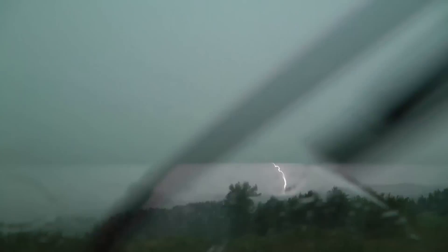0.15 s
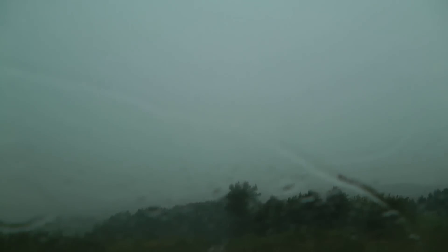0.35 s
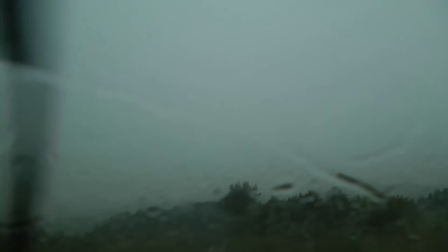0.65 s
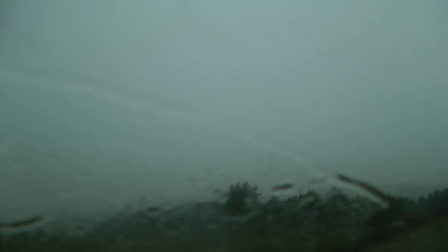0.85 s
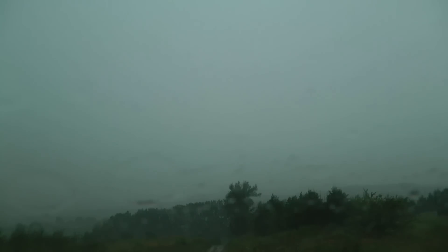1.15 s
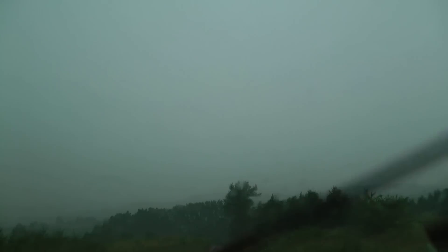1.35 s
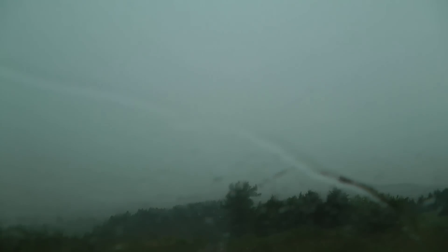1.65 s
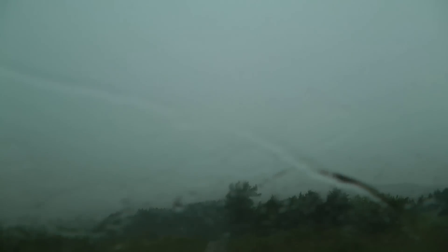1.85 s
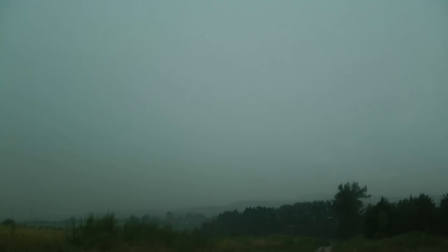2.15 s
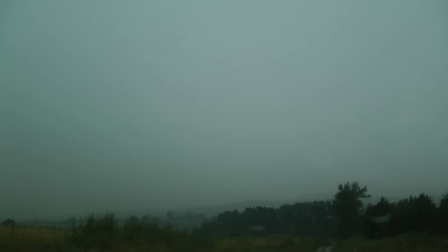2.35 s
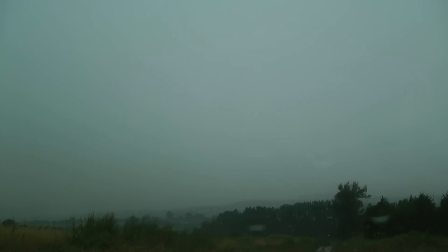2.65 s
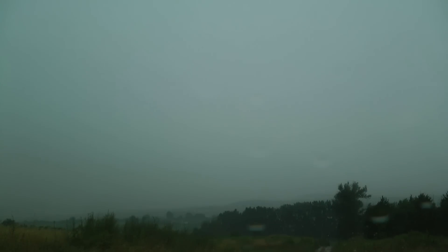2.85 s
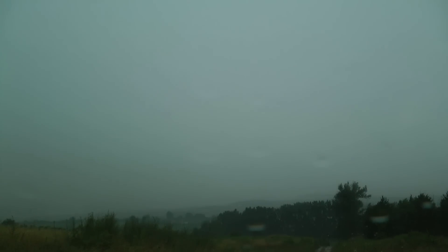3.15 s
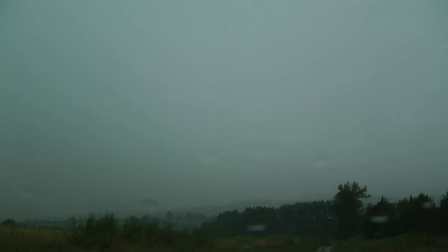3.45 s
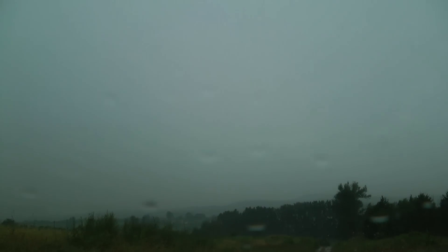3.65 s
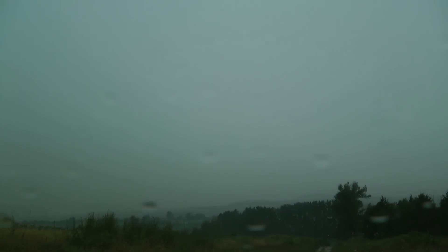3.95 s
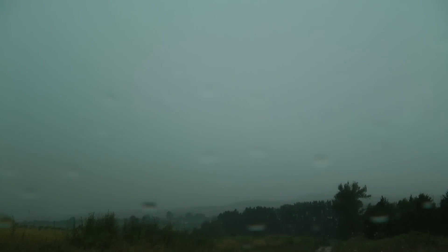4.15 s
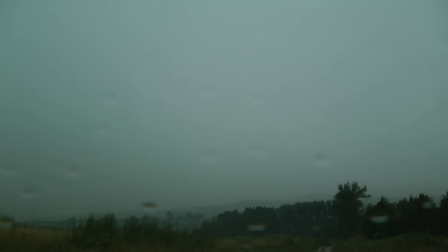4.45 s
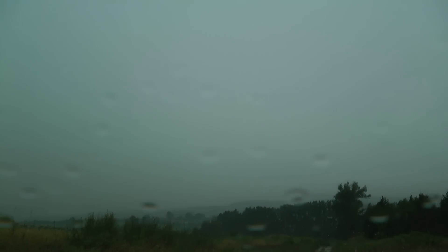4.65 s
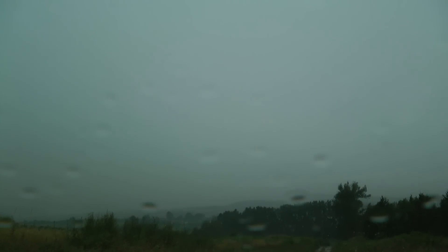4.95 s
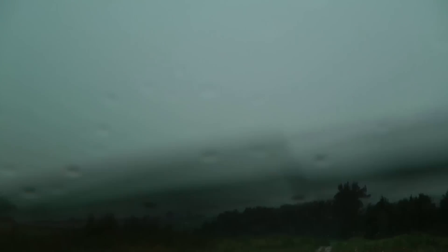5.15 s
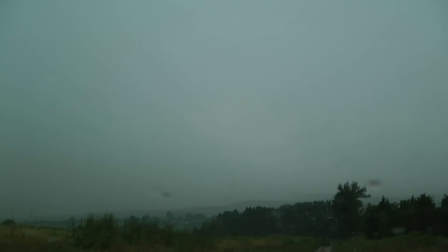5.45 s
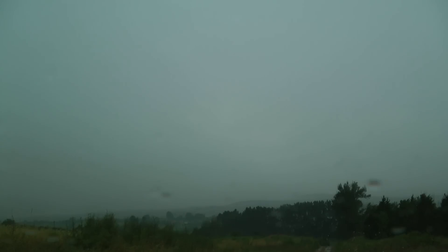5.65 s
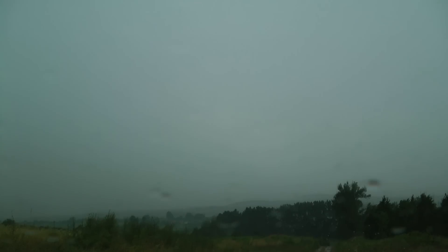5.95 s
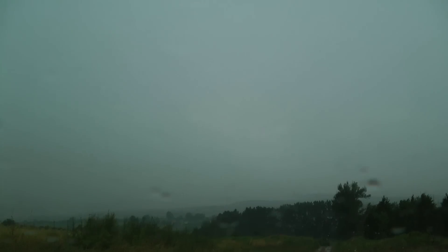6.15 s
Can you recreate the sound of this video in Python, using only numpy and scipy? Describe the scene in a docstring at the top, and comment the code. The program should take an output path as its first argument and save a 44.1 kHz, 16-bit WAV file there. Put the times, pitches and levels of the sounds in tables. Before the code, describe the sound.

A loud downpour crackles on car glass for three seconds, suddenly eases to soft drizzle over engine and fan hum, ending in clustered cabin thumps.

```python
"""Rain on a parked car

Inside a parked car, engine idling and fan on. A downpour drums on the roof (filtered noise) and cracks on the
windshield (dispersed clicks) while wipers knock; after three seconds the scene changes to light rain. Engine
and fan hum as sums of sines, 8.5 dB lower during the downpour. Dull thumps (noise knocks with decaying sine
booms) sound throughout and crowd together near the end, with a tiny squeak."""
import sys
import numpy as np
from scipy import signal
from scipy.fft import irfft
from scipy.io import wavfile

SR = 44100
rng = np.random.default_rng(int(sys.argv[2]) if len(sys.argv) > 2 else 0)


def unload_audio(sound):
    """Save the sound as a 16-bit wav file, at the path given as the first command line argument."""
    columns = np.transpose(np.atleast_2d(sound))
    # keep every value between -1 and 1, then stretch to whole-number steps
    steps = np.round(np.clip(columns, -1, 1) * 32767)
    wavfile.write(sys.argv[1], SR, steps.astype(np.int16))


N = 277830
TIME = np.arange(N) / SR
HZ = np.fft.rfftfreq(8192, 1 / SR) + 1  # offset avoids log(0)
CHANGE_S = 3.031  # the scene changes from downpour to light rain
FAN_HZ = 62.45

# dull thumps in the cabin: start_s, boom_peak_db, pitch_hz, knock_edge_hz, knock_peak_db
THUMPS = [(.066, -23, 223, 1400, -20), (0.287, -16.5, 180, 400, -31), (0.513, -17, 201, 400, -27),
          (0.863, -28, 246, 1490, -15), (.945, -26, 200, 400, -33), (1.066, -24, 205, 400, -33),
          (1.295, -20, 205, 1500, -20), (1.448, -31, 287, 1000, -10), (1.96, -26, 203, 500, -23),
          (2.163, -21, 207, 500, -29), (2.256, -14.5, 208, 500, -22), (2.392, -24, 220, 910, -12),
          (2.48, -26, 231, 597, -26), (2.62, -20, 185, 900, -15), (2.89, -18, 192, 400, -32),
          (3.0, -21, 200, 400, -33), (3.296, -21.5, 202, 497, -24), (3.321, -19, 134, 400, -28),
          (3.351, -24.5, 280, 900, -17), (3.455, -18.5, 198, 400, -31), (4.38, -22, 204, 400, -36),
          (4.934, -24, 124, 400, -27), (4.955, -31, 209, 400, -30), (5.335, -32, 189, 400, -28),
          (5.701, -28, 200, 398, -31), (5.920, -16.5, 205, 400, -28), (5.944, -31, 232, 890, -23.5),
          (5.987, -20.5, 218, 400, -33), (6.054, -23, 224, 900, -31), (6.104, -18, 231, 910, -15.5),
          (6.14, -14.5, 216, 600, -30), (6.161, -15.5, 142, 800, -16), (6.174, -22, 260, 1000, -21),
          (6.181, -17.5, 326, 1550, -9), (6.19, -22, 280, 1400, -22), (6.196, -26, 262, 1600, -22),
          (6.204, -13, 194, 700, -27), (6.219, -18, 130, 400, -29), (6.268, -23, 232, 400, -33)]


def amp(db):
    """Decibels to gain."""
    return 10 ** (np.asarray(db) / 20)


def evened(x):
    """Scales to rms 1."""
    return x / np.sqrt(np.mean(x ** 2) + 1e-20)


def read(points):
    """Spectrum table interpolated over log frequency onto the grid."""
    f, value = np.transpose(points)
    return np.interp(np.log(HZ), np.log(f), value)


def add(mix, s, sound):
    """Mixes a sound in at time s."""
    part = mix[..., max(round(s * SR), 0):][..., :sound.shape[-1]]
    part += sound[..., :part.shape[-1]]


def colour(x, gain):
    """Causal minimum-phase filter with the given gain on the frequency grid."""
    log_gain = np.log(np.maximum(gain / gain.max(), 1e-5))
    circle = np.concatenate([log_gain, log_gain[-2:0:-1]])
    spectrum = np.exp(np.conj(signal.hilbert(circle)))
    taps = np.fft.ifft(spectrum).real[:len(HZ)]
    return gain.max() * signal.oaconvolve(x, taps)[:len(x)]


def below(edge_hz, order):
    """Gain of a low-pass."""
    return 1 / np.sqrt(1 + (HZ / edge_hz) ** (2 * order))


def above(edge_hz, order):
    """Gain of a high-pass."""
    return 1 / np.sqrt(1 + (edge_hz / HZ) ** (2 * order))


def drift(per_s):
    """Random wander: unit-variance knots joined by straight lines."""
    knots = rng.standard_normal(N // 64)
    return np.interp(TIME * per_s, np.arange(len(knots)), knots)


def lifts(resonances):
    """Resonances as dB on the frequency grid."""
    return sum(db / (1 + (2 * (HZ - hz) / width) ** 2) for hz, width, db in resonances)


def body(points):
    """Gain of the car body: a broad colour with its resonances."""
    # cabin air, roof and glass: pitch_hz, width_hz, lift_db
    resonances = [(135, 22, 5), (191, 17, 5.5), (392, 24, -0.5), (493, 146, 2), (677, 45, -1.5),
                  (2007, 47, 2.5), (1410, 240, -0.5), (2040, 400, -3), (4070, 3800, 1), (6120, 1400, -4.5)]
    return amp(read(points) + lifts(resonances))


def in_cabin(hit, place, wet_db, t60_s):
    """Mid and side of a hit with the dense short reflections of its spot."""
    t = np.arange(SR // 24) / SR
    tails = rng.standard_normal((2, len(t))) * amp(-60 * t / t60_s) * (t > .0008)
    paths = amp(wet_db) * tails / np.linalg.norm(tails[0])
    paths[:, 0] = 1, place  # direct sound
    return signal.fftconvolve(hit[None], paths, axes=1)


def impact(bright_db, travel_s, splash_db):
    """One drop: a click whose treble outruns its bass as a bending wave, then a brief splash."""
    tilt = amp(bright_db * above(5640, order=3) ** 2)
    phase = 4 * np.pi * travel_s * np.sqrt(1000 * HZ)  # travel_s is the delay at 1 kHz
    click = np.roll(irfft(tilt * np.exp(-1j * phase)), 32)[:1024]
    t = np.arange(len(click)) / SR
    splash = rng.standard_normal(len(t)) * np.exp(-t / 0.0028)
    splash /= np.linalg.norm(splash)
    return click + amp(splash_db) * signal.fftconvolve(click, splash)[:len(t)]


def patter(per_s, spread_db, largest_db, wet_db, count=90):
    """Random drops, many small and few large, on many spots of the glass; gives mid and side."""
    spots = []
    for k in range(count):
        hit = impact(2.7 * np.sin(k), 0.001789 * rng.random(), -3.5)
        spots.append(in_cabin(hit, 1.68 * rng.uniform(-0.91, 1), wet_db, 0.042))
    size_db = np.minimum(spread_db * rng.exponential(1, N), largest_db)
    size = amp(size_db) * rng.choice([-1, 1], N)
    spot = rng.integers(0, count, N)
    out = np.zeros((2, N))
    for n in np.flatnonzero(rng.random(N) < per_s / SR):
        add(out, n / SR, size[n] * spots[spot[n]])
    return out


def panel(drops, gain, level_db):
    """Drops heard through a panel; level_db sets the mid rms and may vary in time."""
    mid, side = (colour(x, gain) for x in drops)
    return np.array([mid, side]) / mid.std() * amp(level_db)


def spread(rain, width, width_db):
    """Sets how wide the rain is at each frequency by filtering the side."""
    return np.array([rain[0], colour(rain[1], amp(read(width) + width_db))])


def hum(hz, orders, waver, flutter_db):
    """Orders of a turning shaft, each a sine, wavering together in rate and singly in level."""
    turns = np.cumsum(hz * (1 + waver * drift(3.116))) / SR
    out = np.zeros(N)
    for multiple, db in orders:
        level = amp(db + flutter_db * drift(8.4))
        out += level * np.sin(2 * np.pi * (multiple * turns + rng.random()))
    return np.sqrt(2) * out


def engine():
    """Idling engine: orders of the crank rate."""
    # crank orders: multiple, level_db
    orders = [(1, -51.5), (1.6, -56.5), (2, -38.5), (4, -48.5), (5, -42.5)]
    return hum(28.35, orders, waver=.002, flutter_db=.5)


def fan():
    """Overtones of the turning fan."""
    # fan overtones: multiple, level_db
    orders = [(5, -42.5), (8, -47), (14.23, -50.5)]
    return hum(FAN_HZ, orders, waver=.002, flutter_db=1.6)


def drone():
    """Main fan tone; a second, just above it, beats with it unevenly about five times a second."""
    # moments when both tones fall in step and the hum swells: time_s, second_tone_db
    beats = [(3.15, -39), (3.33, -33.5), (3.56, -42), (3.81, -37.5), (3.98, -46), (4.11, -37), (4.28, -42),
             (4.42, -34), (4.62, -36), (4.88, -36), (5.11, -40), (5.34, -33), (5.54, -33), (5.72, -33.5),
             (5.94, -39), (6.13, -44), (6.32, -40)]
    drone_db, fan_multiple = -36.5, 4
    s, db = np.transpose(beats)
    turns = fan_multiple * FAN_HZ * TIME
    lead = np.interp(TIME, s, np.arange(len(s)))  # gains one turn per beat
    fade_in = np.clip((TIME - CHANGE_S) / (s[0] - CHANGE_S), 0, 1)
    first = amp(drone_db) * np.sin(2 * np.pi * turns)
    second = amp(np.interp(TIME, s, db)) * fade_in * np.sin(2 * np.pi * (turns + lead))
    return np.sqrt(2) * (first + second)


def rumble():
    """Low cabin noise rises into each thump and sinks after it."""
    level_db, rise_s, fall_s = -12.5, 0.028, 0.041  # level against the boom peak
    swells = []
    for s, boom_db, *_ in THUMPS:
        distance = np.maximum((s - TIME) / rise_s, (TIME - s) / fall_s)
        swells.append(amp(boom_db) * np.exp(-distance))
    band = above(100, order=4) * below(284, order=4)
    noise = evened(colour(rng.standard_normal(N), band))
    return amp(level_db) * np.linalg.norm(swells, axis=0) * noise


def squeak():
    """A tiny falling squeak: one gliding sine."""
    # squeak path: time_s, level_db, pitch_hz
    path = [(6.283, -55, 1450), (6.287, -30, 1400), (6.3, -44, 1330)]
    s, db, hz = np.transpose(path)
    turns = np.cumsum(np.interp(TIME, s, hz)) / SR
    return amp(np.interp(TIME, s, db)) * (TIME > s[0]) * np.sin(2 * np.pi * turns)


def thumps():
    """A ragged, rattling knock sets the cabin air booming."""
    # resonances of the knocked panel: pitch_hz, width_hz, lift_db
    resonances = [(340, 130, 2.5), (580, 120, 4.5), (790, 120, -6), (945, 240, 4), (1310, 130, -1),
                  (1480, 130, -4)]
    blow_s, rattle, rattle_s = 0.0013, 0.14, 0.0085
    boom_rise_s, boom_t60_s = 0.0041, 0.087
    out, t = np.zeros(N), np.arange(SR // 3) / SR
    force = t / blow_s * np.exp(1 - t / blow_s) + rattle * np.exp(-t / rattle_s)
    swell = amp(-60 * t / boom_t60_s) * (1 - np.exp(-t / boom_rise_s))
    panel_gain = amp(lifts(resonances)) * below(850, order=1) * above(200, order=2)
    for s, boom_db, hz, edge_hz, knock_db in THUMPS:
        boom = np.sin(2 * np.pi * hz * t) * swell
        knock = colour(force * rng.standard_normal(len(t)), panel_gain * below(edge_hz, order=14))
        boom *= amp(boom_db) / abs(boom).max()
        knock *= amp(knock_db) / abs(knock).max()
        add(out, s, boom + knock)
    return out


def wipers():
    """Each reversal of the arms is a soft low knock through the bulkhead, at a steady beat."""
    first_s, stroke_s, knock_s, level_db = 0.324, .635, 0.066, -28.5
    reversals_s = np.arange(first_s, CHANGE_S, stroke_s)
    strength = sum(np.exp(-((TIME - s) / knock_s) ** 2) for s in reversals_s)
    knock = colour(rng.standard_normal(N), above(84, order=4) * below(170, order=4))
    return amp(level_db) * strength * evened(knock)


def plinks():
    """A few drops ring for a moment at one pitch."""
    # ringing drops: start_s, peak_db, pitch_hz
    rings = [(.06, -27, 4750), (.0745, -17.5, 4200), (.726, -22, 3720)]
    peak_s = 0.0022  # time to the envelope peak
    out, t = np.zeros(N), np.arange(SR // 25) / SR
    envelope = t / peak_s * np.exp(1 - t / peak_s)
    for s, db, hz in rings:
        add(out, s, amp(db) * envelope * np.sin(2 * np.pi * hz * t))
    return out


def drizzle():
    """Light rain: a soft wash from the roof and small ticks on the glass."""
    # light rain through the car body: pitch_hz, relative_db
    rain_colour = [(24, -31.5), (45, -24.5), (85, -10.5), (120, -14.5), (190, -10.5), (270, -10.5),
                   (350, -10), (420, -14), (600, -15), (790, -18.5), (960, -25.5), (2000, -33.5),
                   (3800, -36), (6000, -40.5), (10400, -55)]
    wash_db, ticks_db, ticks_wander_db = -27.5, -46.5, 0.7
    gain = body(rain_colour)
    roof = panel(rng.standard_normal((2, N)), gain * below(1650, order=2), wash_db)
    ticks = patter(3000, spread_db=2.9, largest_db=18, wet_db=-2.0)
    glass = panel(ticks, gain * above(1350, order=3), ticks_db + ticks_wander_db * drift(4.9))
    return roof + glass


def large_drops():
    """Fat drops crack on the glass close by and scatter a little spray."""
    # largest windshield drops: time_s, relative_db, treble_lift_db
    drops = [(0.0458, -8, -12), (0.0625, -12.0, -6.5), (0.078, -16, -16), (0.1433, -15.5, 2),
             (0.184, -15, 2), (0.1973, -10, 3), (0.2313, -10, -1.5), (0.2492, -12, 5), (0.265, -14, 5),
             (0.3604, -19, 6), (0.368, -19.5, 7.0), (0.3767, -15, 11), (0.419, -22, 13), (0.449, -7.5, -1),
             (0.581, -8.5, -2), (0.6294, -13, -3), (0.7055, -17.5, 12.5), (0.7287, -17, -10.5),
             (0.7643, -16, -5), (0.785, -9.5, -14.5), (0.8064, -22.5, 15), (0.8207, -15, 4),
             (0.867, -7.5, -7.5), (0.907, -14.5, 4.0), (0.9346, -11.5, 5), (0.9422, -11, 5),
             (0.9502, -20, 8), (0.9704, -21, 14), (0.978, -15, 12.5), (1.0088, -15, 13), (1.0294, -20, 11),
             (1.0976, -19, 6), (1.1047, -17.5, 2), (1.1474, -9, -8.0), (1.155, -10, -18), (1.169, -13, -6),
             (1.205, -17, -8), (1.2452, -13, -2.5), (1.3027, -15, 3), (1.3462, -7.5, -10.5),
             (1.3514, -12.5, 0), (1.366, -22.5, 15.0), (1.378, -11, -6.5), (1.456, -24, 4),
             (1.4896, -11, -6), (1.5044, -13.5, 3), (1.5244, -17.5, 9.5), (1.6075, -13, 2),
             (1.6273, -16, 11), (1.6596, -23.5, 14), (1.745, -20, 12), (1.7537, -11, 7), (1.784, -8, -16.5),
             (1.8, -10, -10), (1.8594, -9, -2), (1.8763, -15.5, 2), (1.912, -10, -6.5),
             (1.9328, -13.0, -7.5), (1.959, -26, 11), (1.9875, -18, 7), (2.0497, -22.0, 9.0),
             (2.0598, -13.0, -1), (2.07, -12.5, 6), (2.1131, -13, 4), (2.242, -27, 12.5), (2.25, -15, -16),
             (2.3088, -9.5, -2), (2.3295, -17, 1), (2.3717, -10, -13), (2.436, -8, -13),
             (2.492, -14, -10.5), (2.5144, -14, -7.5), (2.5332, -15, -3), (2.6285, -7.5, -4.5),
             (2.6492, -21, 9), (2.6957, -11, 4), (2.712, -13.0, -8), (2.722, -15, 8), (2.7451, -8.0, 0.5),
             (2.757, -8, -1), (2.7736, -12, -4), (2.7774, -21, 14), (2.812, -15, 2), (2.8697, -5, -7.5),
             (2.91, -26, 17), (2.917, -24, 20.5), (2.9804, -14, -0.5), (3.542, -29, -13), (3.7155, -37, 3),
             (3.9988, -37, 3), (4.0162, -30, -1.5), (4.0424, -30.0, -2.5), (4.1267, -37, -2),
             (4.3929, -31, -15), (4.424, -27.5, -12.5), (4.4928, -25.5, -9.5), (4.7472, -33, 0),
             (4.7784, -25.5, -14), (4.8498, -31, -1), (4.858, -30, -14.5), (5.0995, -35, 1),
             (5.183, -37, 9), (5.3212, -31, -6.5), (5.4334, -31, -9), (5.4436, -33, 3), (5.5037, -34, 0),
             (5.7184, -33, -6), (5.8964, -41, 16), (6.1161, -32, -2.5), (6.141, -42, 12)]
    near_travel_s, travel_s_per_db = .0006, .0001  # duller drops land farther off, more smeared
    out = np.zeros((2, N))
    for s, db, bright_db in drops:
        travel_s = near_travel_s + travel_s_per_db * np.maximum(-bright_db, 0)
        hit = impact(bright_db, travel_s, -5.0)
        add(out, s - .001, amp(db) * in_cabin(hit, rng.uniform(-1.1, 1.2), -6.5, 0.05))
    # glass colour: pitch_hz, gain_db
    glass = amp(read([(150, -4), (500, 12.5), (1300, 17.0), (2000, 18), (3800, 18.5), (6000, 12.5),
                      (10000, 2.0)]))
    return np.array([colour(x, glass) for x in out])


def gust_db(s):
    """Strength of the downpour at time s, driven by gusts."""
    # gusts: time_s, strength_db
    gusts = [(0.0, -21), (0.15, -23.5), (0.38, -24), (0.6, -23), (0.8, -23), (0.95, -22.5), (1.02, -24.5),
             (1.21, -24.5), (1.48, -23.5), (1.58, -24.5), (1.7, -25), (1.76, -22.5), (1.82, -23.5),
             (1.87, -22.5), (2.2, -24), (2.46, -23), (2.72, -23.5), (2.8, -25), (3.02, -23)]
    return np.interp(s, *np.transpose(gusts))


def downpour():
    """The lined roof blurs countless drops to a drumming; the bare glass passes each crack."""
    # heavy rain through the car body: pitch_hz, relative_db
    rain_colour = [(24, -41), (40, -36), (86, -15), (190, -5), (251, -4.5), (310, -5), (391, -5.5),
                   (638, -10.5), (768, -9), (969, -12), (1370, -9.5), (1820, -12.5), (3820, -14),
                   (4900, -17.5), (10400, -31.5), (13500, -87), (22000, -120)]
    # sheets of water on the roof: centre_s, half_length_s, lift_db
    surges = [(0.05, 0.062, 1.5), (0.238, 0.016, 4), (.76, 0.018, -0.5), (0.869, 0.034, 3.5),
              (1.062, 0.024, 1), (1.144, 0.016, 3.5), (1.297, .025, 3), (1.402, .012, 4),
              (1.454, 0.022, 1.5), (1.497, 0.017, 5), (1.74, 0.013, 3), (1.858, 0.012, 3.5),
              (1.935, 0.017, 2), (2.029, 0.017, 4.5), (2.1, 0.031, 4), (2.234, 0.069, 4.5), (2.41, 0.09, 4),
              (2.594, 0.072, 4), (2.749, .010, 7), (2.84, 0.044, 3)]
    roof_db, glass_db = -0.45, -2.5  # against the gust strength
    flurry_db, flurries_per_s = 0.83, 45
    gain, strength_db = body(rain_colour), gust_db(TIME)
    surge_db = sum(db * np.exp(-((TIME - s) / half_s) ** 2) for s, half_s, db in surges)
    drumming = rng.standard_normal((2, N))
    roof = panel(drumming, gain * below(1300, order=3), strength_db + roof_db + surge_db)
    cracks = patter(1600, spread_db=3.7, largest_db=14.3, wet_db=-3.5)
    cracks_db = strength_db + glass_db + flurry_db * drift(flurries_per_s)
    glass = panel(cracks, gain * above(1020, order=2), cracks_db)
    return roof + glass


def scene():
    """Downpour, then light rain; hum and thumps sit in the middle, the rain spreads out."""
    # side gain of downpour and large drops, before trim: pitch_hz, side_db
    heavy_width = [(60, -15), (90, -10), (130, -19), (200, -21.5), (300, -20.5), (450, -16), (670, -11),
                   (1000, -10), (1490, -8.5), (2230, -4.5), (3340, -8.5), (4990, -11), (7450, -8),
                   (11100, -4)]
    # side gain of light rain, before trim: pitch_hz, side_db
    light_width = [(60, -22), (90, -17), (130, -22.5), (200, -24.5), (300, -25), (450, -22), (670, -15),
                   (1000, -9), (1490, -7.5), (2230, -5), (3340, -8.5), (4990, -11.5), (7450, -8),
                   (11100, -3)]
    late = np.clip((TIME - CHANGE_S) / 0.0066 + .5, 0, 1)  # 6.6 ms crossfade
    heavy = spread((1 - late) * downpour() + large_drops(), heavy_width, 0.3)
    light = spread(late * drizzle(), light_width, 0.6)
    mid, side = heavy + light
    running = (engine() + fan() + drone()) * (late + amp(-8.5) * (1 - late))
    mid = mid + running + wipers() + thumps() + rumble() + plinks() + squeak()
    return np.array([mid + side, mid - side]) * amp([[.1], [-.1]])  # left/right trim in dB


def record(dry):
    """Steep linear-phase low-pass limits the band."""
    edge_hz = 10600
    steep = signal.firwin(701, edge_hz, window=("kaiser", 8), fs=SR)
    return signal.oaconvolve(dry, steep[None], "same", axes=1)


dry = scene()
out = record(dry)
unload_audio(out)
```